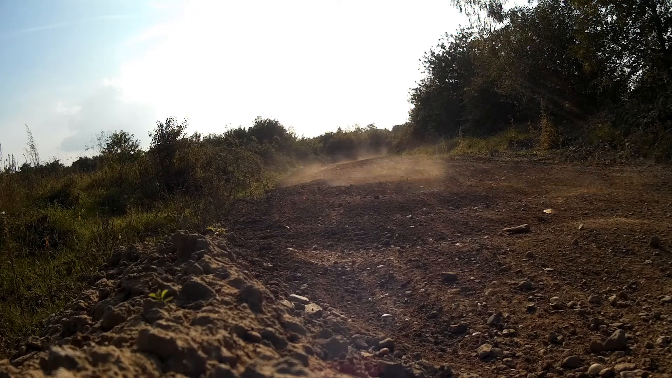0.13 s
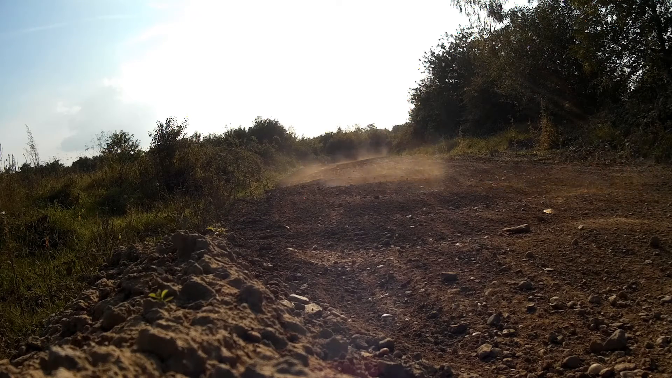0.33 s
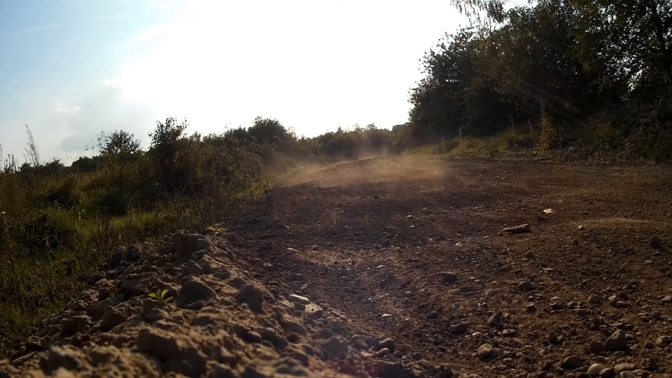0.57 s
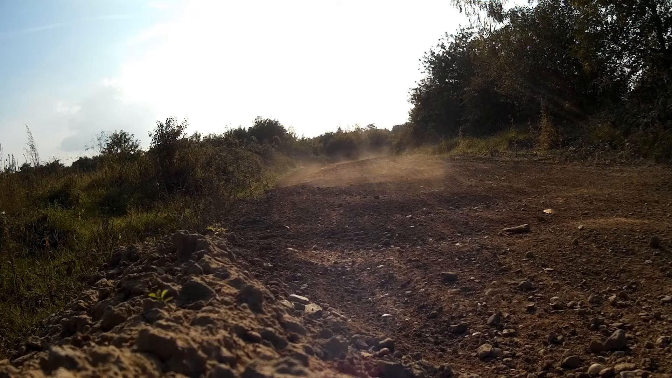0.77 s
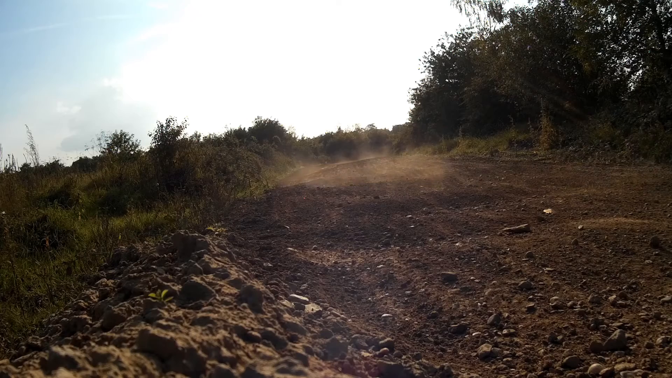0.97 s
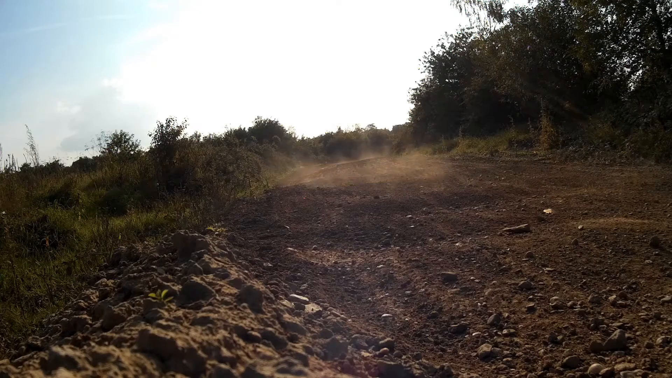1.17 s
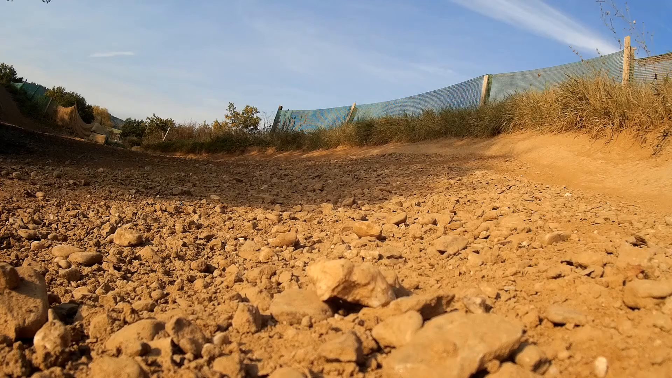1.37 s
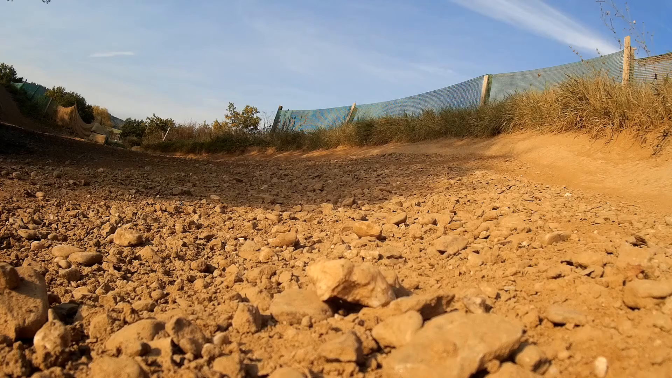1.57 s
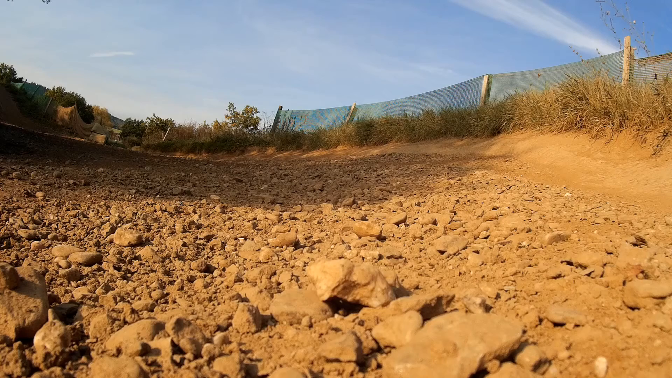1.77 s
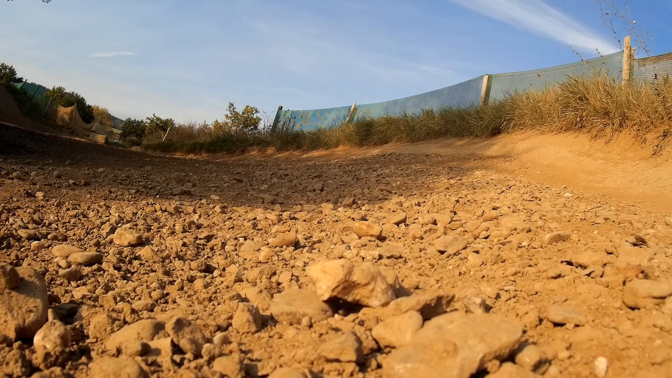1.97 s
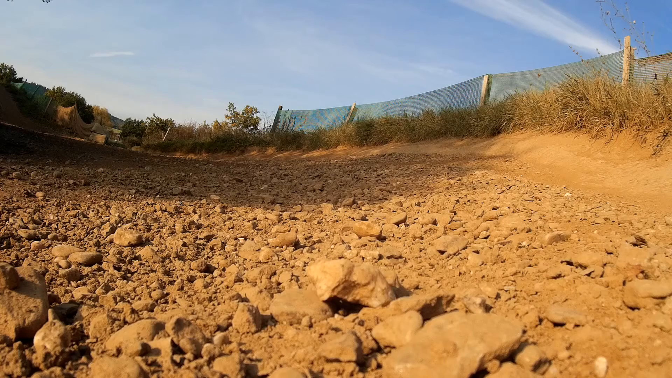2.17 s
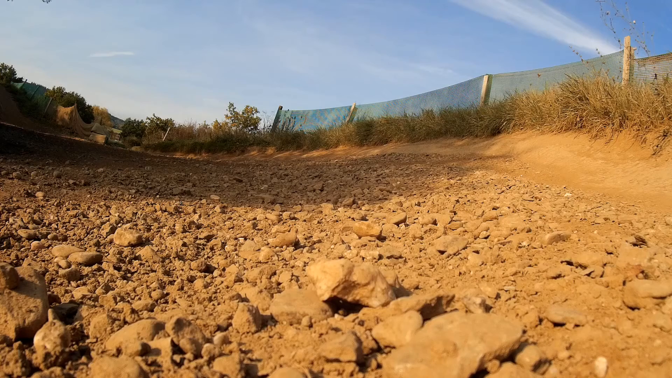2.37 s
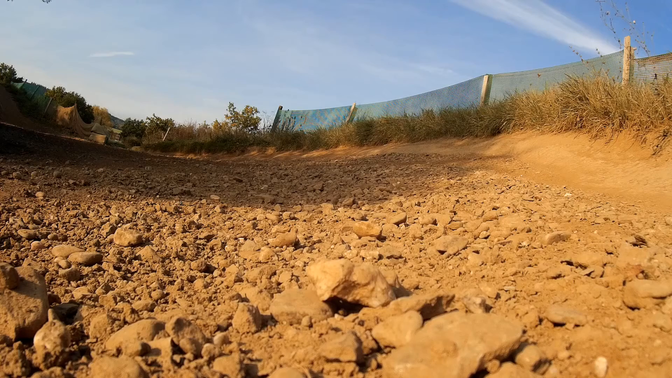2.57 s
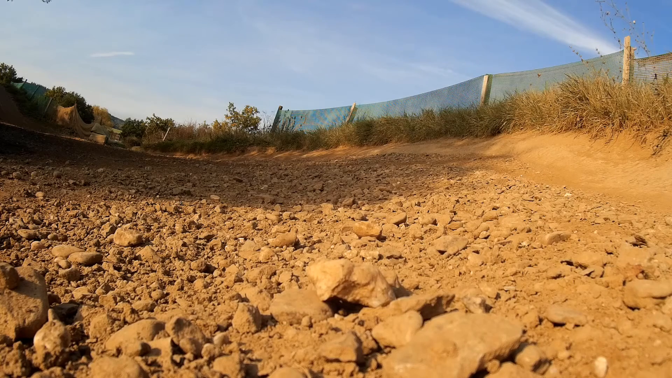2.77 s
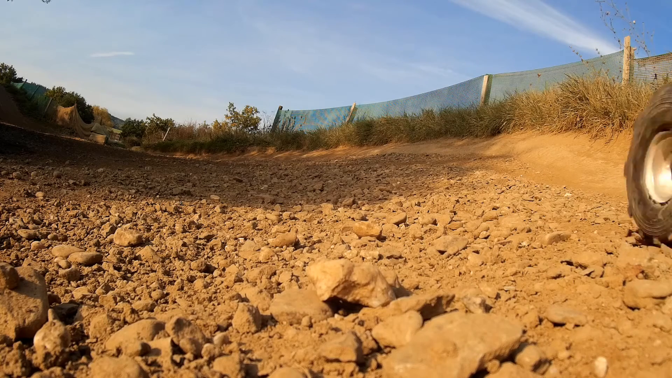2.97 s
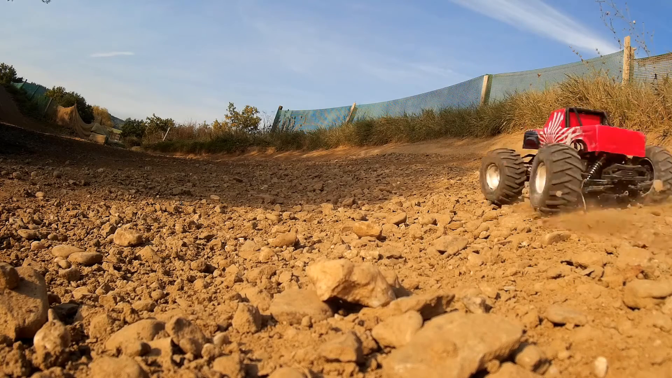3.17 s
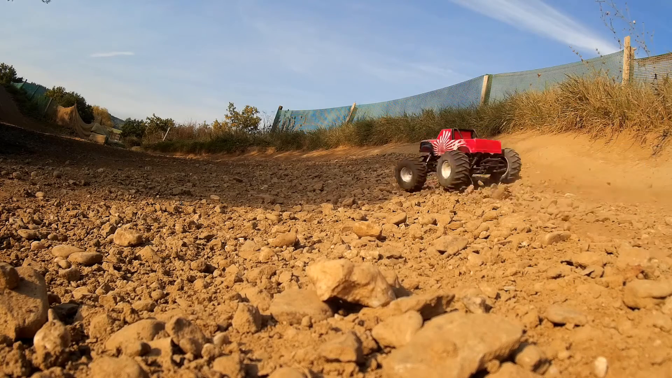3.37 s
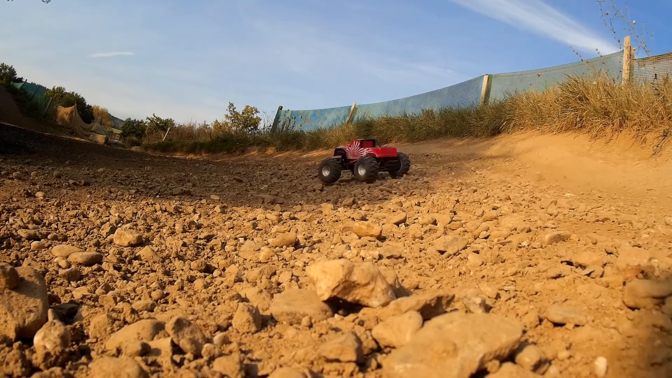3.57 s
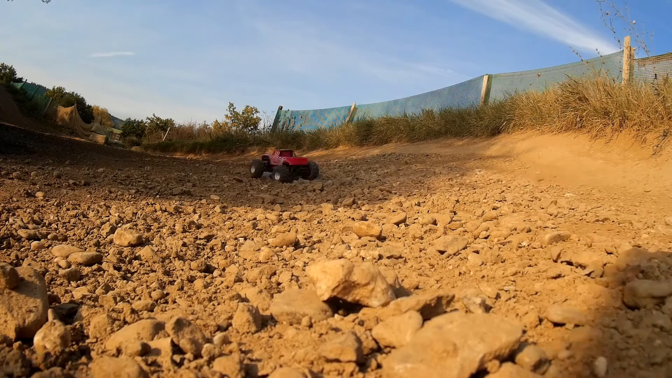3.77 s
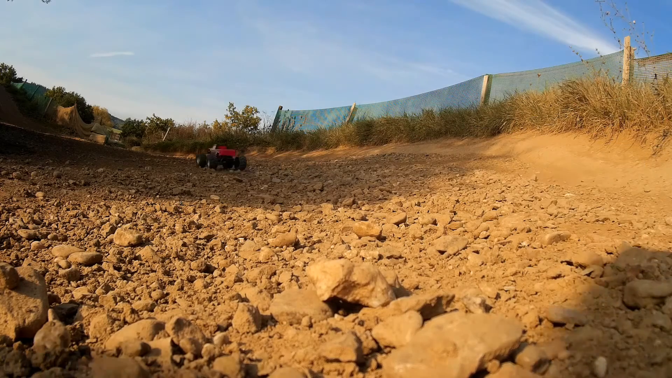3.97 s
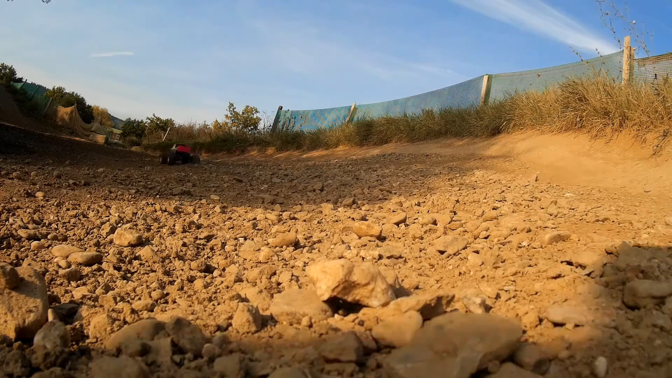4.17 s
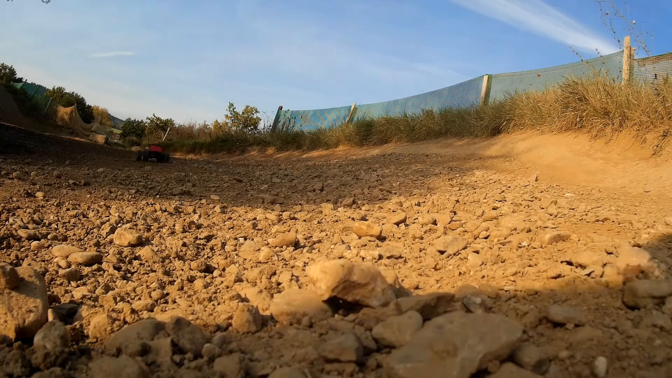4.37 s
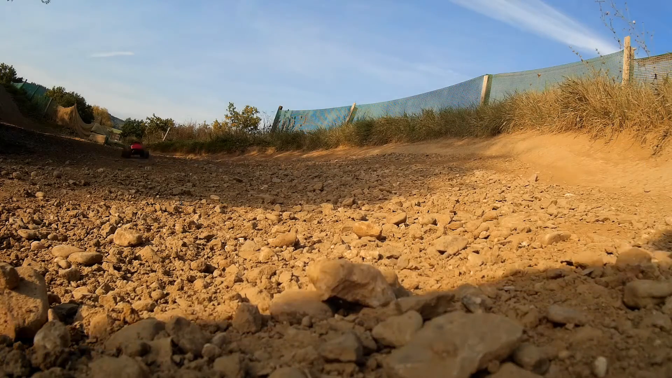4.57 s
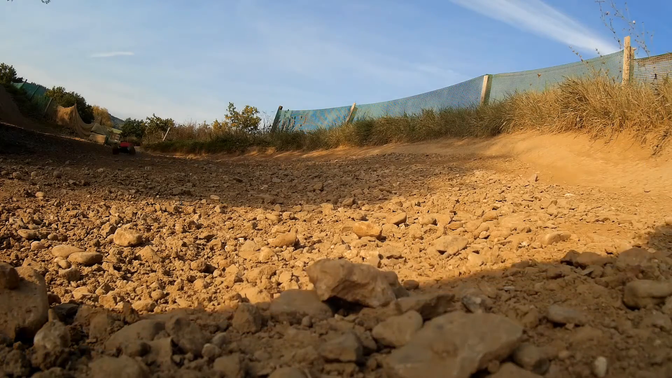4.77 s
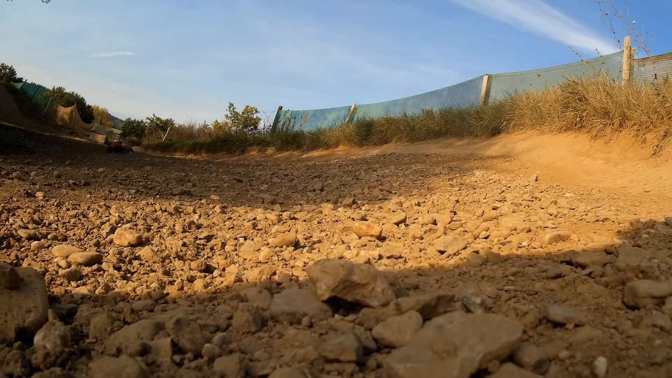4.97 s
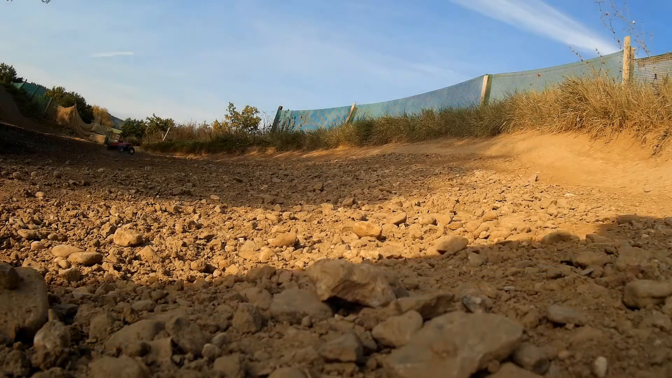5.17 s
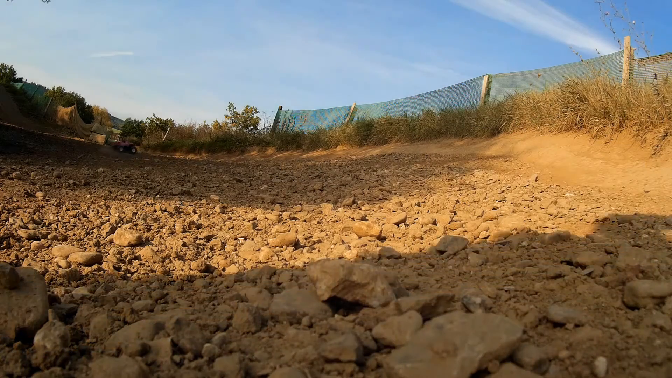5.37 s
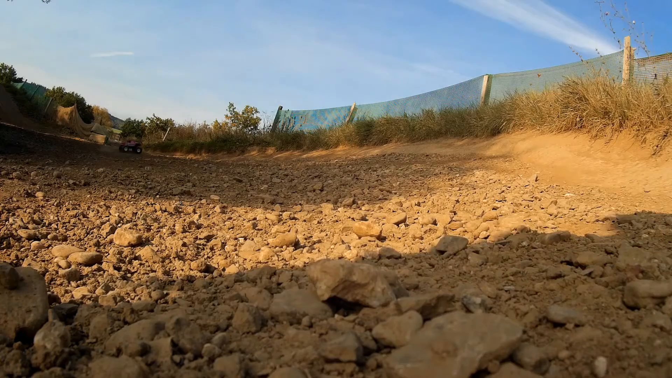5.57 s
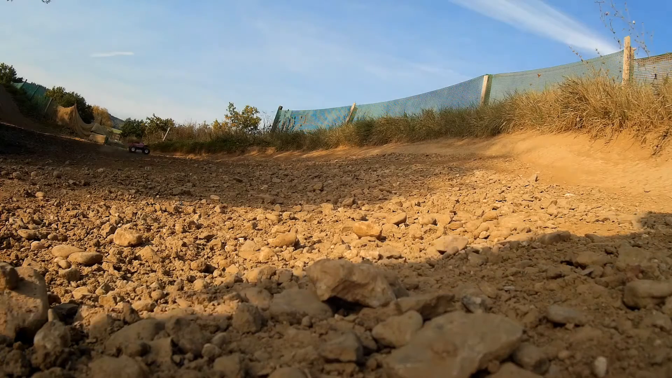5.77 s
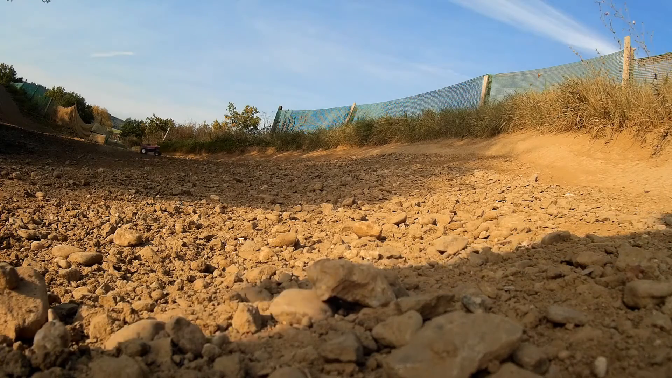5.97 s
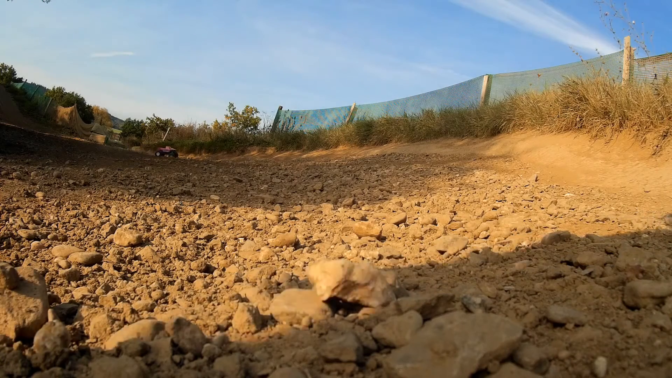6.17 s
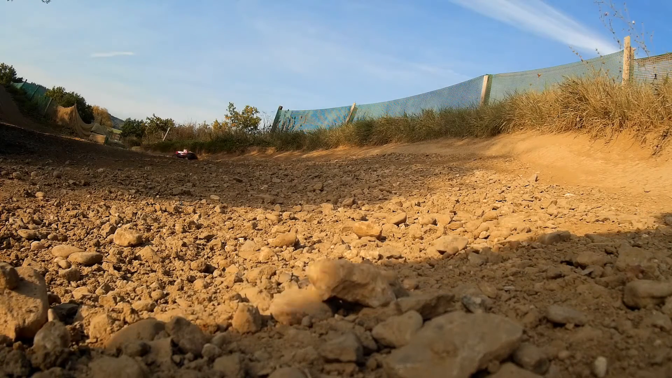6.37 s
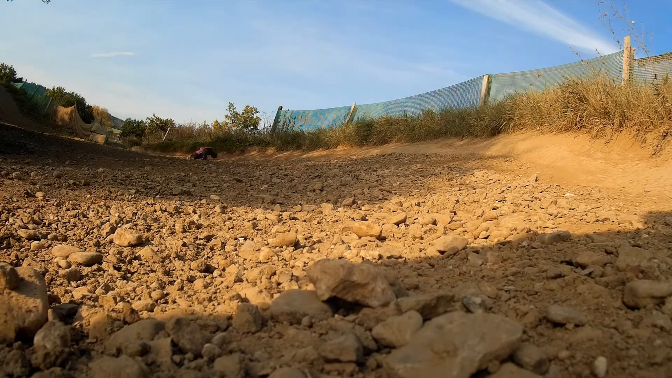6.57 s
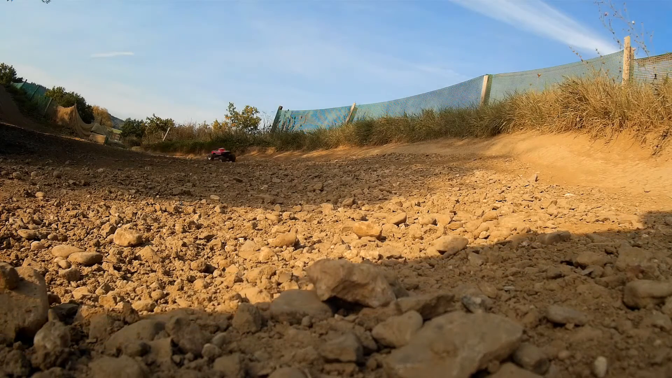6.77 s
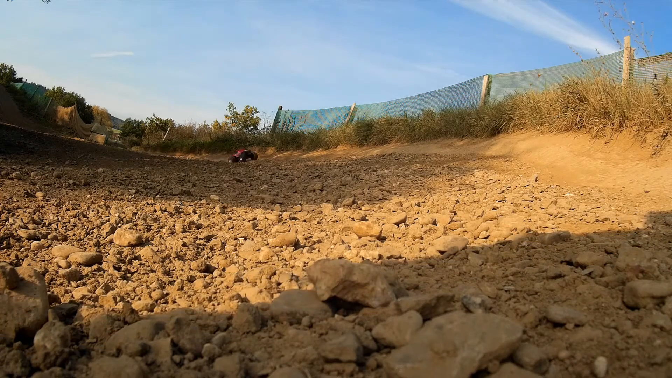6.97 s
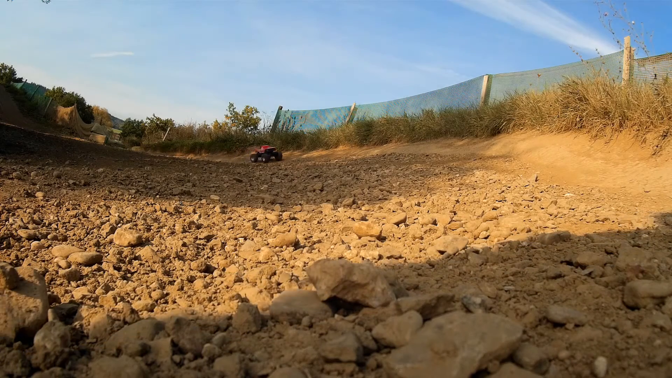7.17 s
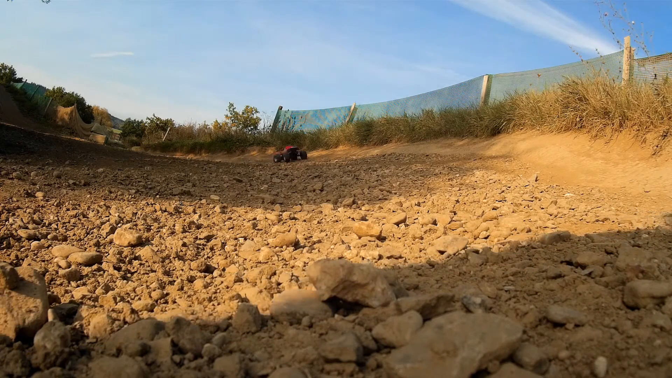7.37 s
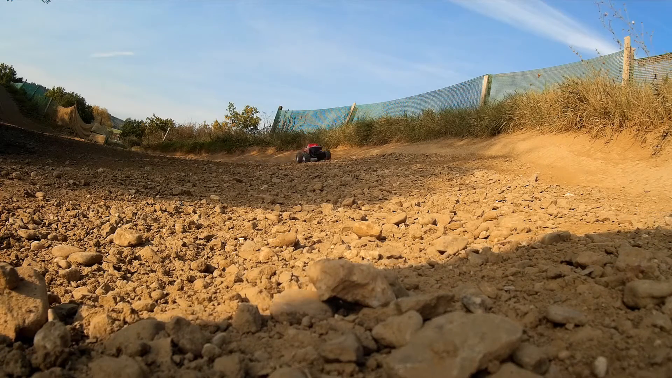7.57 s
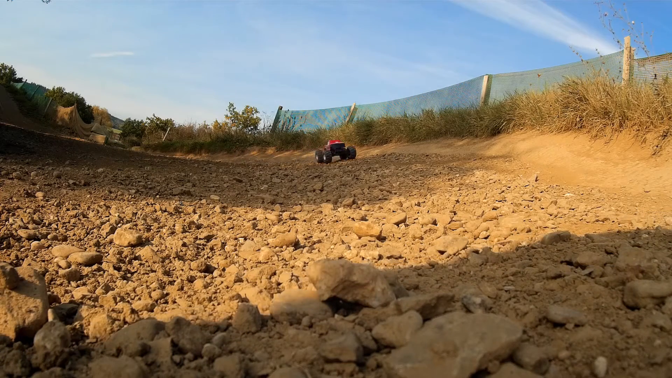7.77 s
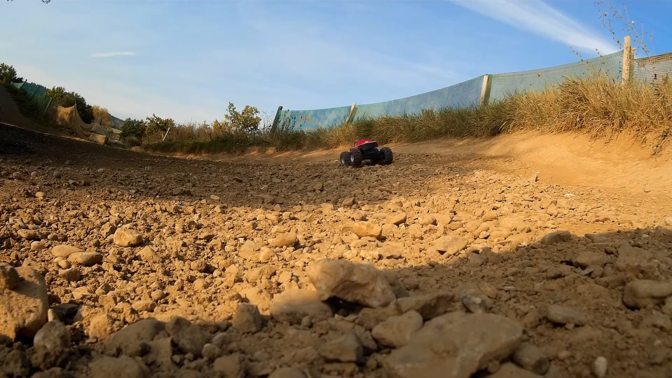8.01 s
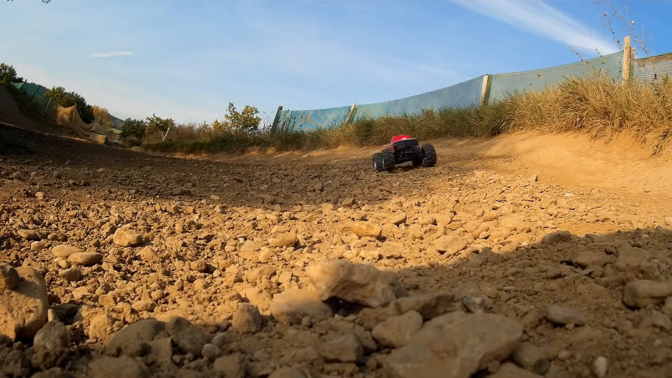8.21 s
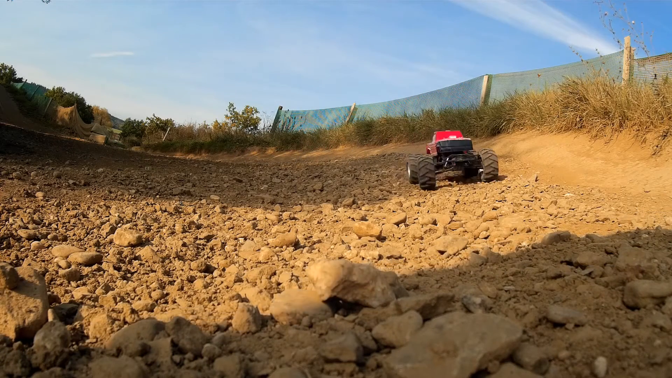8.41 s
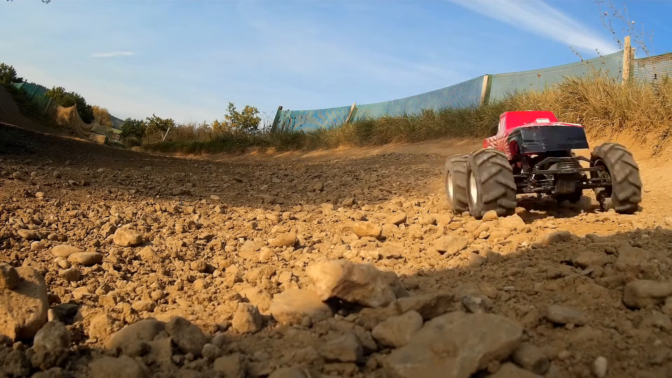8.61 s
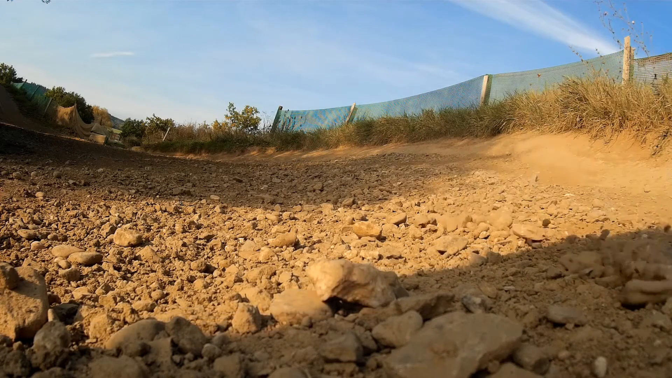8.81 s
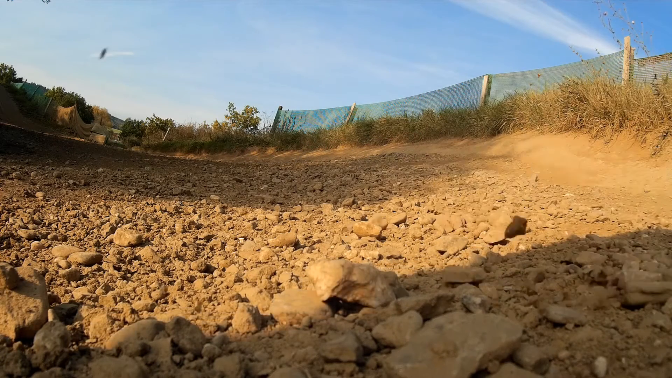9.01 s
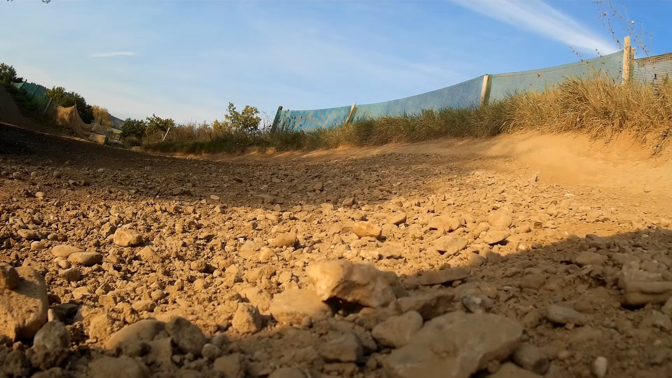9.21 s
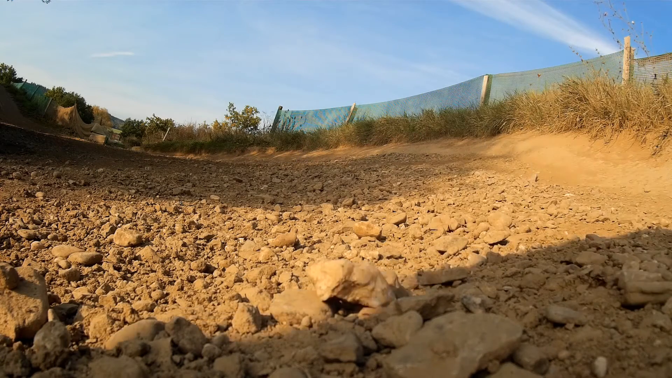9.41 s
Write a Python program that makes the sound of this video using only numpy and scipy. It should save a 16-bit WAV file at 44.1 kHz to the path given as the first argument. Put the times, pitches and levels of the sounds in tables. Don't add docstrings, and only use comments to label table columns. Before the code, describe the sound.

A low, boxed microphone lies beside an outdoor gravel track. At 0 s a small electric truck's granular tyre crunch is already leaving, almost gone by 0.9, with a stone knock at 1.1. At 1.2 the scene cuts to steadier crunching and a growing, wavering gear whine around 3 kHz. From 2.5 it surges, peaking at 2.7-2.9 in a harsh, overloaded rush of gravel, whine and hiss. Stones knock and click until about 4 while the truck recedes; fine grit patters down to 4.8. Distant crunch stays faint, the motor easing off near 5. At 5.3-5.8 a low, rough whirr pulses through a slow turn, then climbs to nearly 4 kHz by 6.7, with faint controller singing. Crunch and knocks build from 7, swelling to a second, louder, abrupt clipped pass at 8.7. It drops quickly into nearby crunching, stone ticks and falling grit, ending around 9.4.

```python
import sys
import numpy as np
from scipy import signal
from scipy.fft import rfft, irfft, next_fast_len
from scipy.io import wavfile
from scipy.ndimage import map_coordinates

SR = 44100
rng = np.random.default_rng(int(sys.argv[2]) if len(sys.argv) > 2 else 0)


def rack_gain(trim_db):
    fader = np.asarray(trim_db, float)
    return 10 ** (fader / 20)


def master_out(mix):
    frames = np.transpose(np.atleast_2d(mix))
    ceiling = np.clip(frames, -1, 1)
    pcm = np.round(ceiling * 32767).astype(np.int16)
    wavfile.write(sys.argv[1], SR, pcm)


N = 416744

# (time [s], level [dB], clearness [dB])
ROLL_FIRST = [
    (0, -29, -3),
    (.55, -36.5, -7),
    (.68, -44, -2.5),
    (.76, -52, -5),
    (.84, -55.5, -6),
    (.93, -64, -4),
    (1.184, -55, -4),
]
# (time [s], level [dB], clearness [dB])
ROLL = [(1.191, -38, 6), (1.79, -32, 7), (2.04, -38.5, 11), (2.11, -32.5, 3.5), (2.59, -24, 4.5),
        (2.71, -12.5, 1.5), (3.14, -18, 0), (3.63, -21.5, -6.5), (4.0, -31.5, -7.5), (5.28, -42.5, -7),
        (5.59, -38, -7), (6.18, -38.5, -14.5), (7.91, -26.5, -13), (8.34, -21.5, -2), (8.71, -11.5, 1.5),
        (9.1, -25.5, 4.5), (9.43, -23.5, -0.5), (9.45, -25, -0.5)]
# (time [s], extra level [dB], length [s])
JOLTS = [(2.118, 7, 0.058), (2.02, -1, 0.096), (3.05, -1.5, 0.027), (3.76, 4, 0.026), (5, -3.5, 0.026),
         (4.7, 3, 0.052), (5.76, -6.5, 0.08), (0.091, 2, 0.036), (3.3, 3, 0.079), (6.18, 2.5, 0.28),
         (8.79, 3.5, .035), (8.69, 3, 0.014), (8.6, 3, 0.015), (8.73, 3.5, .015), (9.395, 2.5, 0.015),
         (5.6, 5.5, 0.065), (6.75, -1, 0.065), (6.87, 5, 0.12), (8.83, -1.5, 0.029), (8.99, 4, 0.057),
         (9.41, 6, 0.031)]
# (time [s], extra clearness [dB], length [s])
CLEARNESS_SWELLS = [
    (.15, -1.5, 0.24),
    (.8, 5, 0.055),
    (4.5, 7.5, 0.35),
    (7.3, -4, 0.78),
    (3.3, 2.5, .1),
    (8.94, -3, 0.11),
]
# (time [s], extra level [dB], length [s])
GRIT_SWELLS = [(.3, 8.5, 0.62), (1.3, 4.5, 0.17), (2.35, 14, 0.32), (2.75, 7, 0.077), (3.7, 0.5, .2),
               (4.5, -17, .3), (6.4, 10, .3), (7.3, 17.5, 0.44), (7.9, 16.5, 0.34), (8.5, 3, 0.11),
               (8.66, 6.5, 0.082), (3.2, -6, 0.18), (8.9, 5, .08), (3.55, -1, 0.14), (9.3, 9.5, 0.28)]
# (offset [dB], share of level, share of clearness,
# share of drive effort, share of spray)
TYRE_LAW = [(-3.5, 1, -0.0029, 0.018, -0.052), (-0.1, 1, 0.049, 0.017, 0.084),
            (-1.56, 1, 1.06, 0.046, 0.13), (-7.0, 0.43, 1.06, 0.7, -0.3)]
TYRE_BORDERS_HZ = (20, 450, 1100, 2100, 3200)
# (frequency [Hz], level [dB per Hz])
CRUNCH_SPECTRUM = [(15, -50), (25, -18.5), (96, -7.5), (131, -0.5), (237, 0.5), (394, 1), (437, -0.5),
                   (699, -1), (1050, -4.5), (1610, -9), (2190, -27), (3300, -36), (4290, -52), (7260, -120)]
# (time [s], peak level [dB], frequency [Hz])
KNOCKS = [(0.046, -23, 503), (0.052, -29, 795), (0.465, -30, 910), (1.036, -43, 610), (1.045, -38, 703),
          (1.047, -45, 1600), (1.101, -18, 970), (1.1, -40, 450), (0.995, -48, 1900), (1.172, -40, 600),
          (1.175, -45, 2200), (5.611, -26, 900), (1.376, -15, 1170), (1.716, -15, 1400), (1.799, -14, 480),
          (2.124, -7, 670), (3.296, -2, 774), (3.378, -7, 900), (3.399, -9, 900), (3.447, -6, 680),
          (3.648, -10, 800), (3.709, -8, 480), (3.777, -10, 560), (3.891, -13.5, 391), (4.93, -33, 543),
          (5.564, -22, 1210), (5.589, -27, 1160), (6.222, -23, 750), (6.498, -25, 840), (6.53, -16, 736),
          (6.887, -19.5, 336), (6.891, -20, 700), (6.93, -20, 334), (7.222, -15, 338), (7.222, -25, 800),
          (7.567, -16, 607), (7.808, -13, 383), (7.809, -17, 800), (7.916, -13, 624), (8.297, -18, 1100),
          (8.485, -10, 571), (8.55, -3, 900), (8.6, 0, 1010), (8.686, 9, 1130), (8.823, -2, 1300),
          (8.954, -8, 1210), (9.113, -11, 1300), (9.384, -17, 900)]
# (time [s], centre frequency [Hz])
HOWL_RIDGES = [
    [(2.0, 1660), (2.32, 1578), (2.54, 1627), (2.63, 1922), (2.95, 1898), (3.1, 1796), (3.4, 1750)],
    [(8.3, 1303), (8.5, 1597), (8.7, 1800), (8.76, 1955), (8.81, 2270), (8.87, 2489), (8.93, 2177),
     (9.0, 1900), (9.06, 1703), (9.12, 1980), (9.22, 1804), (9.6, 1850)],
]
HOWL_EXTRA_DB = (0.5, 2)

# (time [s], level [dB], spray [dB])
DRIVE_FIRST = [
    (0.0, -57.5, -24.5),
    (0.64, -65.5, -15),
    (0.72, -77.5, -11),
    (0.85, -86.5, 0),
    (1.182, -84, 2),
]
# (time [s], level [dB], spray [dB])
DRIVE = [(1.19, -54.5, -6.5), (1.81, -50.5, -6), (2.43, -42.5, -14), (2.52, -33, -9), (2.8, -23, -16),
         (3.05, -34.5, -15.5), (3.261, -30.5, -13), (3.7, -37.5, 3), (4.0, -52, -4), (4.8, -65, -7),
         (5.599, -64.5, 4), (6.25, -64.5, 4), (6.6, -56.5, 1), (7.3, -47.5, 8), (8.3, -38.5, -3),
         (8.72, -26.5, -12.5), (8.85, -32, -24), (9.2, -40.5, -16), (9.24, -43.5, -22), (9.45, -45.5, -23)]
# (time [s], extra level [dB], length [s])
STABS = [(1.92, 3, .08), (5.33, -13, 0.14), (3.2, 4.5, .08), (9.29, -2, 0.062), (8.6, 1.5, .02),
         (8.665, 6, 0.037), (8.78, 6, 0.03), (8.9, 1, 0.063), (5.1, 0, .3), (9.18, 5, 0.013),
         (9.4, 8, 0.046), (3.08, -1, .05), (5.82, 5, .03), (12, 5.5, .02), (9.365, -5.5, .012),
         (2.9, 2.5, .04), (3.78, 0, .03)]
# (start [s], end [s], change [dB])
COASTS = [
    (4.782, 5.32, -14),
    (5.699, 5.803, -11),
]
# (offset [dB], share of effort, share of spray)
DRIVE_LAW = [(2.5, 0.99, 0.01), (-5.5, 0.92, 0.39), (-1.5, 0.96, 0.93)]
DRIVE_BORDERS_HZ = (2900, 6900, 11200, 20000)
# (frequency [Hz], level [dB per Hz])
HISS_SPECTRUM = [(1760, -38), (3000, -12), (3770, -11), (4270, -12), (5910, -11), (6700, -18.5), (9940, -9),
                 (14500, -12), (15700, -2.5)]

# (time [s], mesh frequency [Hz], level [dB])
MESH_APPROACH = [(1.44, 3030, -68), (1.62, 3070, -58), (1.8, 2920, -64), (1.93, 3100, -48),
                 (2.03, 3860, -46), (2.12, 3950, -50), (2.15, 2990, -53), (2.28, 3050, -42),
                 (2.42, 3220, -47)]
MESH_BY = [(2.5, 3160, -34), (2.56, 3493, -32), (2.63, 4036, -29.5), (2.7, 3990, -22.5), (2.76, 3650, -17),
           (2.83, 3470, -15.5), (2.91, 3765, -20.5), (2.95, 3626, -25), (3.01, 3950, -24.5),
           (3.07, 3675, -20), (3.14, 3744, -24), (3.2, 3757, -28.5), (3.33, 3767, -34.5), (3.42, 3740, -36),
           (3.52, 3766, -35), (3.62, 3780, -51), (3.8, 3870, -48), (4.0, 3820, -74)]
MESH_TURN = [(5.33, 1146, -51), (5.47, 1198, -43.5), (5.505, 1450, -40), (5.54, 1240, -44),
             (5.6, 1270, -44), (5.64, 1454, -34.5), (5.7, 1260, -60), (5.81, 1490, -44), (5.92, 1970, -61)]
MESH_CLIMB = [(5.9, 1909, -66), (6.05, 2112, -64), (6.13, 2150, -70), (6.2, 2298, -65), (6.27, 2352, -67),
              (6.33, 2562, -70), (6.4, 2700, -66), (6.45, 2998, -59), (6.54, 3215, -55.5),
              (6.64, 3700, -57), (6.72, 3870, -48), (6.8, 3786, -46.5)]
MESH_RETURN = [(6.88, 3780, -46.5), (6.97, 3337, -48), (7.03, 3680, -48), (7.1, 3780, -46),
               (7.16, 4100, -48), (7.19, 4480, -52), (7.23, 4500, -56), (7.27, 4000, -46),
               (7.33, 3676, -48), (7.45, 3904, -45), (7.55, 3950, -60), (7.65, 3880, -49), (7.8, 3910, -60),
               (7.9, 3855, -62)]
MESH_LAST = [(8.2, 3730, -44), (8.5, 3690, -45), (8.549, 4350, -54), (8.68, 4400, -37.5), (8.76, 4648, -25),
             (8.849, 4330, -28)]
# (double offset [dB], double share of mesh level,
# others offset [dB], others share of mesh level)
RELATIVES = [
    (-35, 0.5, -24, 0.65),
    (-51, 0.5, -57, 0.2),
    (-46, 0.5, -33, .55),
]
# (time [s], extra level [dB], length [s])
SQUEALS = [(1.53, 17, 0.05), (1.88, 15, .07), (2.24, 11, .07), (2.48, 9, .03), (2.58, 8, .04),
           (2.89, 14, .06), (3.1, 5, .08), (3.33, 9, .04), (5.42, 12, .07), (5.82, 4, 0.036),
           (6.34, 26, .05), (6.43, 20, .04), (6.51, 21, .05), (6.75, 12, .1), (7.02, 17, .05),
           (7.12, 18, .06), (7.33, 21, .05), (7.42, 22, 0.06), (7.68, 20, 0.1)]
# (time [s], extra level [dB], length [s])
SINGING = [(2.54, 12, .06), (2.66, 9, .04), (2.75, 9, .05), (2.9, 10, .07), (3.3, -4, .25), (5.44, 2, .07),
           (5.64, -1, .04), (5.87, -8, .06), (6.04, 6, .05)]
# (time [s], lower tone level [dB], upper tone level [dB])
SWITCHING = [(5.25, -69, -80), (5.5, -68, -76), (5.75, -67, -76), (5.83, -58, -70), (5.92, -62, -76),
             (6.06, -59, -68), (6.2, -60, -76), (6.292, -74, -80), (6.356, -56, -72), (6.5, -62, -73)]
SWITCH_HZ = (3950, 8000)

# (time [s], peak level [dB], frequency [Hz], burst level [dB])
TICKS = [(1.1013, -47, 3220, -10), (2.99, -2.5, 3950, -20), (3.2185, -0.5, 4940, -10.5),
         (3.2993, -16.5, 2917, -5), (3.3395, -20, 7430, -4), (3.351, -21, 3020, -3), (3.637, -27, 2580, 3),
         (3.9308, -39, 2500, -6), (3.989, -35, 3626, -8), (4.0161, -34, 5970, -7.5),
         (4.06, -39.5, 5700, -8), (4.2221, -38, 3680, -9), (5.562, -37, 1880, -25), (5.572, -33, 1670, -25),
         (5.588, -34, 1900, -25), (6.0516, -42, 8000, -6), (8.644, -11, 2600, -6),
         (8.7896, -18.5, 5700, -14), (9.1042, -21.5, 4730, -6.5), (9.1782, -18, 5570, -16.5),
         (9.2645, -20, 2570, -20), (9.342, -25, 2500, -20), (9.3814, -23, 2600, -13)]
# (start [s], peak rate [grains per s], level [dB])
SETTLING = [
    (3.6, 40, -39),
    (8.75, 40, -40),
]
# (time [s], peak level [dB])
LANDINGS = [(3.9886, -38), (4.0056, -37), (4.059, -36), (4.071, -38), (4.1049, -37), (4.1128, -30),
            (4.1523, -29), (4.1972, -42), (4.2056, -39), (4.2221, -40), (4.2431, -38.5), (4.2705, -43),
            (4.3498, -46), (4.4366, -49), (4.4675, -45), (4.4995, -45), (4.5858, -50), (4.5967, -45),
            (4.6197, -45), (4.2976, -40), (4.482, -46), (4.638, -45), (4.779, -44), (4.7065, -50),
            (4.7619, -45), (4.8113, -51),
            (9.0323, -33), (9.0648, -48), (9.1052, -46), (9.1326, -27), (9.178, -41), (9.2344, -50),
                 (9.2643, -49), (9.3272, -50), (9.385, -49), (9.394, -44), (9.416, -47)]
# (frequency [Hz], half width [Hz], level [dB])
GRAIN_RINGS = [(5800, 300, -3), (8000, 300, -9), (10000, 400, 2), (11900, 450, 1), (12900, 300, 1),
               (14700, 400, 0)]
# (frequency [Hz], level [dB per Hz])
AIR_SPECTRUM = [(12, -51), (20, -28), (39, -3), (59, -3.5), (88, -27.5), (275, -25), (672, -30.5),
                (4480, -38), (13300, -41), (15700, -45)]
# (time [s], level [dB], length [s])
GUSTS = [
    (.8, -54, 0.37),
    (2.951, -41.5, .15),
    (3.446, -44.5, 0.098),
    (8.793, -27, 0.13),
]


def tyres(bumps, levels_db):
    shake = grains(per_s=4000, spread_db=2.5) + rng.standard_normal(N)
    shake = shake * rack_gain(0.57 * bumps + 1.8 * drift(45))
    return layered(shake, levels_db, TYRE_BORDERS_HZ, CRUNCH_SPECTRUM, own_db=1.1, own_rate=5.7)


def knocks():
    out = np.zeros(N + SR)
    noises = rng.standard_normal((len(KNOCKS), SR // 25))
    for (s, db, hz), noise in zip(KNOCKS, noises):
        ring, fall = blow(hz, cycles=1.25, sag=.2)
        band = signal.butter(4, [hz / 2, 1.75 * hz], "band", fs=SR, output="sos")
        crumb = rms_one(signal.sosfilt(band, noise))
        at = round(s * SR)
        out[at:at + len(ring)] += rack_gain(db - 4.5) * (ring + .35 * crumb * fall)
    return out[:N]


def howl(db):
    out = np.zeros(N)
    for ridge, smear, extra_db in zip(HOWL_RIDGES, (.09, .083), HOWL_EXTRA_DB):
        span = slice(int(ridge[0][0] * SR), int(ridge[-1][0] * SR))
        hz = in_time(ridge)[0][span]
        out[span] = rack_gain(extra_db) * rough_tone(hz, smear, clean=0) * while_on(ridge, 0.15)[span]
    return rack_gain(db + 2.7 * drift(15)) * out


def drive_hiss(bumps, levels_db):
    shake = 1.1 * grains(per_s=5000, spread_db=3.0) + rng.standard_normal(N)
    shake = shake * rack_gain(0.57 * bumps + 1.2 * drift(46))
    lag_s, phase_turns = 0.0004807, 0.8
    size = next_fast_len(N)
    turns = np.arange(size // 2 + 1) * SR / size * lag_s - phase_turns
    echo = irfft(rfft(shake, size) * np.exp(-2j * np.pi * turns), size)[:N]
    echo = map_coordinates(echo, [np.arange(N) + .45 * drift(1.7)], order=3)
    share = .43 * np.clip((-16 - levels_db[0]) / 10, 0, 1)
    combed = (shake + share * echo) / np.hypot(1, share)
    return layered(combed, levels_db, DRIVE_BORDERS_HZ, HISS_SPECTRUM, own_db=1.03, own_rate=8.6)


def gear_whine(table, law, others, smear, clean):
    span = slice(int(table[0][0]) * SR, int(table[-1][0] + 1.1) * SR)
    hz, mesh_db = (c[span] for c in in_time(table))
    double_offset, double_share, other_offset, other_share = law
    double_db = double_offset + double_share * mesh_db + swells(SQUEALS)[span]
    other_db = other_offset + other_share * mesh_db + swells(SINGING)[span]
    hz = hz * (1 + .007 * drift(25, size=len(hz)))
    skip_db = 1.6 * drift(18, size=len(hz))
    tones = rack_gain(mesh_db + skip_db) * rough_tone(hz, smear, clean)
    tones += rack_gain(double_db + skip_db) * rough_tone(2 * hz, smear * .8, clean)
    for multiple, db in others:
        tones += rack_gain(other_db + db - skip_db) * rough_tone(multiple * hz, smear=.04, clean=.8)
    out = np.zeros(N)
    out[span] = tones
    return out * while_on(table)


def controller():
    span, out = slice(5 * SR, 7 * SR), np.zeros(N)
    for db, hz, smear in zip(in_time(SWITCHING), SWITCH_HZ, (.04, .003)):
        out[span] += rack_gain(db[span] + 1.0) * rough_tone(np.full(2 * SR, hz), smear, clean=.5)
    return out * while_on(SWITCHING)


def ticks():
    out = np.zeros(N + SR)
    noises = rng.standard_normal((len(TICKS), SR // 25))
    for (s, db, hz, burst_db), noise in zip(TICKS, noises):
        ring, fall = blow(hz, cycles=hz * .0007, sag=.12)
        at = round(s * SR)
        out[at:at + len(ring)] += rack_gain(db - 1.5) * (ring + rack_gain(burst_db) * noise * fall)
    return out[:N]


def settling():
    draw, size, clicks = rng.random(N), rng.standard_normal(N), 1e-18
    for s, per_s, db in SETTLING:
        age = np.maximum(np.arange(N) / SR - s, 0) / 0.37
        landed = draw < per_s * age * np.exp(1 - age) / SR
        clicks = clicks + landed * size * rack_gain(db)
    s, db = np.transpose(LANDINGS)
    clicks[(s * SR).astype(int)] += rack_gain(db + 19)
    start, out = 3 * SR, np.zeros(N)
    for hz, width, db in GRAIN_RINGS:
        struck = clicks[start:] * rack_gain(db + 4.5 * rng.standard_normal(N - start))
        ring = signal.butter(2, [hz - width, hz + width], "band", fs=SR, output="sos")
        out[start:] += signal.sosfilt(ring, struck)
    return out


def air():
    t = np.arange(N) / SR
    gust = sum(rack_gain(db) * np.exp(-((t - s) / length) ** 2) for s, db, length in GUSTS)
    low_band = signal.butter(2, [22, 95], "band", fs=SR, output="sos")
    wind = rms_one(signal.sosfilt(low_band, rng.standard_normal(N)))
    floor_db = -55.5 - 3 * (t < 1.19) + drift(2.1)
    return rack_gain(floor_db) * coloured(rng.standard_normal(N), AIR_SPECTRUM) + gust * wind


def coasting():
    return sum(db * while_on([[start], [end]], fade=.12 * (end - start) + .012)
               for start, end, db in COASTS)


def by_law(law, *controls):
    return [db + sum(share * c for share, c in zip(shares, controls)) for db, *shares in law]


def layered(shake, levels_db, edges, spectrum, own_db, own_rate):
    return sum(rack_gain(db + own_db * drift(own_rate)) * coloured(shake, spectrum, low, high)
               for db, low, high in zip(levels_db, edges, edges[1:]))


def grains(per_s, spread_db):
    sizes = rack_gain(spread_db * np.minimum(rng.exponential(1, N), 4)) * rng.choice([-1, 1], N)
    return rms_one(sizes * (rng.random(N) < per_s / SR))


def blow(hz, cycles, sag):
    turns = np.arange(SR // 25) / SR * hz
    fall = turns / cycles * np.exp(1 - turns / cycles)
    pitch = 1 + sag - sag * np.minimum(turns / (4 * cycles), 1)
    return np.sin(2 * np.pi * turns * pitch) * fall, fall


def rough_tone(hz, smear, clean):
    cycles = np.cumsum(hz) / SR
    step = cycles * SR / hz.max()
    height, phase = (np.interp(step, np.arange(len(hz)), drift(smear * hz.max(), size=len(hz)))
                     for _ in range(2))
    return (clean + height) * np.cos(2 * np.pi * cycles) + phase * np.sin(2 * np.pi * cycles)


def coloured(x, spectrum, low=10, high=20000, skirt=0.31):
    size = next_fast_len(N)
    octave = np.log2(np.arange(1, size // 2 + 2) * SR / size)
    above = 1 + np.tanh((octave - np.log2(low)) / skirt)
    below = 1 - np.tanh((octave - np.log2(high)) / skirt)
    shape = rack_gain(at_hz(spectrum, 2 ** octave)) * above * below
    return rms_one(irfft(rfft(x, size) * shape, size)[:N])


def at_hz(spectrum, hz):
    table_hz, table_db = np.transpose(spectrum)
    return np.interp(np.log(hz), np.log(table_hz), table_db)


def drift(rate, size=N):
    step = 16 if rate < 100 else 1
    r, run_in = np.exp(-2 * np.pi * rate * step / SR), SR // 4 // step
    noise = rng.standard_normal(size // step + 2 + run_in)
    slow = rms_one(signal.lfilter([1], [1, -2 * r, r * r], noise)[run_in:])
    return np.interp(np.arange(size) / step, np.arange(len(slow)), slow)


def swells(rows):
    t = np.arange(0, N + 64, 64) / SR
    bells = sum(db * np.exp(-((t - s) / length) ** 2) for s, db, length in rows)
    return np.interp(np.arange(N) / SR, t, bells)


def while_on(table, fade=0.064):
    t = np.arange(N) / SR
    return np.clip((t - table[0][0]) / fade, 0, 1) * np.clip((table[-1][0] - t) / fade, 0, 1)


def in_time(*tables):
    s, *columns = np.transpose(np.vstack(tables))
    return [np.interp(np.arange(N) / SR, s, c) for c in columns]


def rms_one(x):
    return x / np.sqrt(np.mean(x ** 2) + 1e-20)


def scene():
    bumps = drift(14)
    roll_db, clear_db = in_time(ROLL_FIRST, ROLL)
    effort_db, spray_db = in_time(DRIVE_FIRST, DRIVE)
    clear_db = clear_db + swells(CLEARNESS_SWELLS)
    lulls = [(s - .008, -3, .008) for s, *_ in KNOCKS]
    roll_db = roll_db + swells(JOLTS + lulls)
    effort_db = effort_db + swells(STABS) + coasting()

    passing, turning, returning = RELATIVES
    whine = gear_whine(MESH_APPROACH + MESH_BY, passing, [(.5, 0), (.69, 0)], .05, 1.0)
    whine += gear_whine(MESH_TURN, turning, [(3, 0), (4, -4)], .05, .9)
    whine += gear_whine(MESH_CLIMB + MESH_RETURN + MESH_LAST, returning, [(.5, 0), (2.67, -3)], .065, .8)

    *body_db, grit_db = by_law(TYRE_LAW, roll_db, clear_db, effort_db, spray_db)
    truck = tyres(bumps, body_db + [grit_db + swells(GRIT_SWELLS)])
    truck += howl(roll_db - 7.5 + 1.72 * clear_db)
    truck += drive_hiss(bumps, by_law(DRIVE_LAW, effort_db, spray_db))
    truck += whine + controller()
    return (truck + knocks() + ticks() + settling() + air())[None]


def top_cut(x):
    return signal.sosfilt(signal.butter(12, 15870, fs=SR, output="sos"), x)


def record(dry):
    knee = 8.0
    clipped = 0.98 * dry / (1 + np.abs(dry) ** knee) ** (1 / knee)
    low_pass = signal.cheby2(12, 45, 15780, fs=SR, output="sos")
    mix = signal.sosfilt(low_pass, clipped)
    return top_cut(mix)


dry = scene()
out = record(dry)
master_out(out)
```